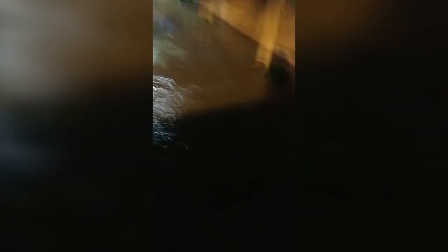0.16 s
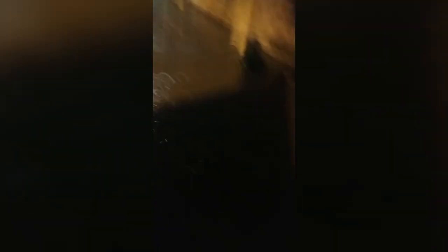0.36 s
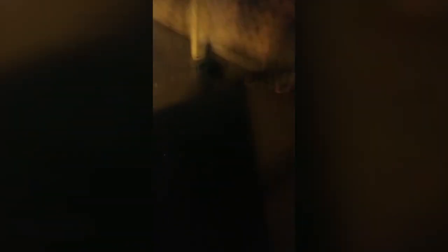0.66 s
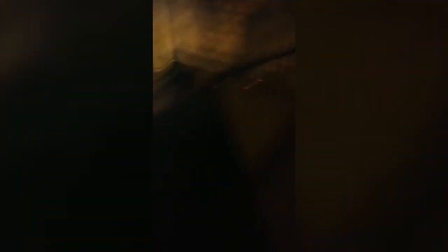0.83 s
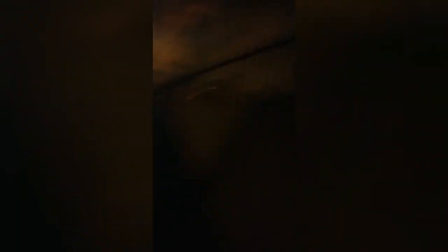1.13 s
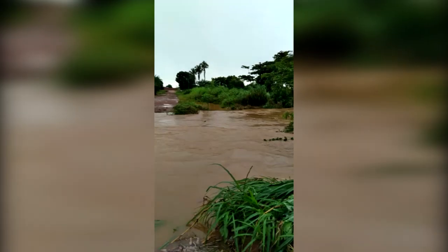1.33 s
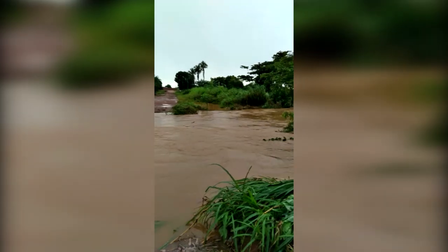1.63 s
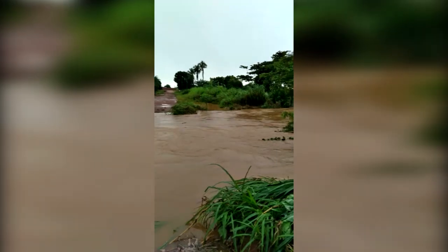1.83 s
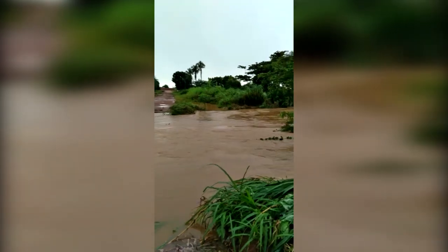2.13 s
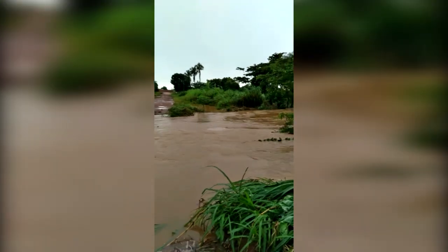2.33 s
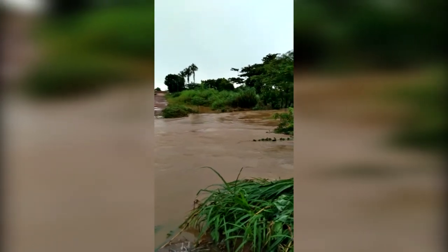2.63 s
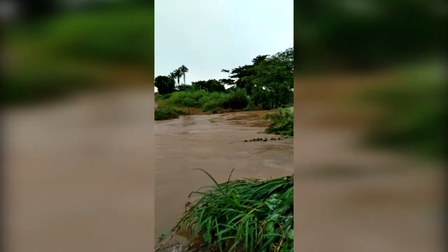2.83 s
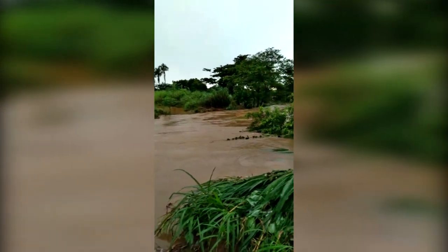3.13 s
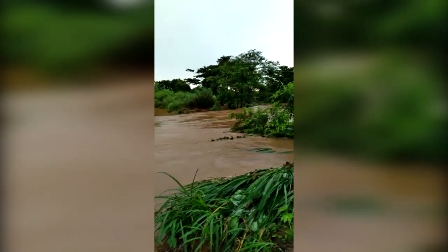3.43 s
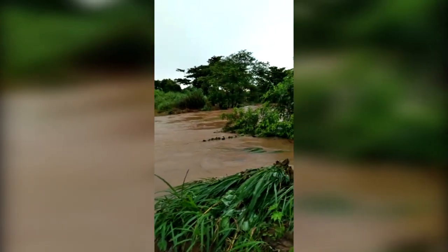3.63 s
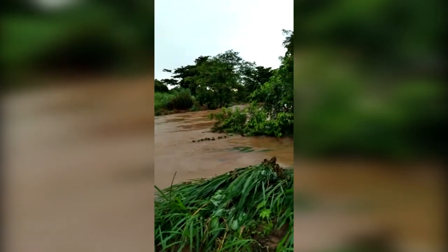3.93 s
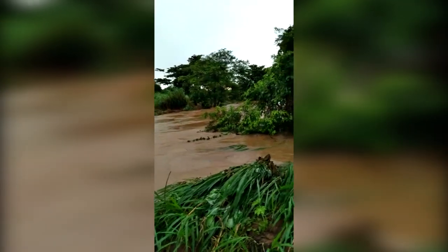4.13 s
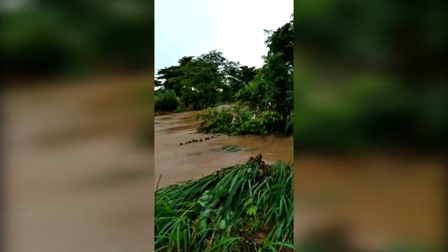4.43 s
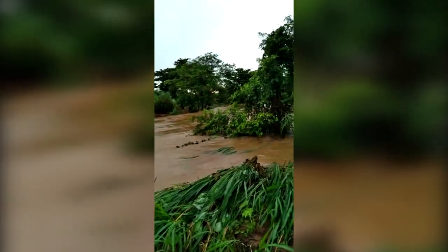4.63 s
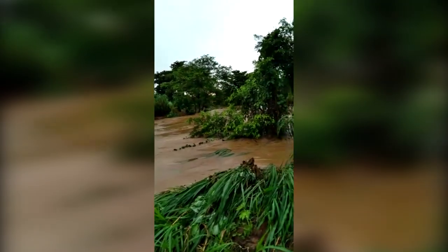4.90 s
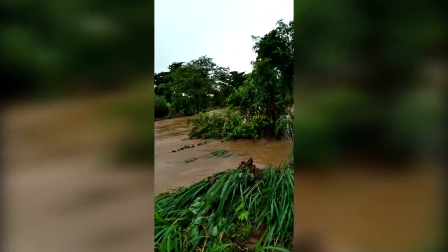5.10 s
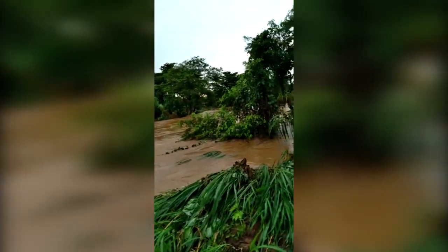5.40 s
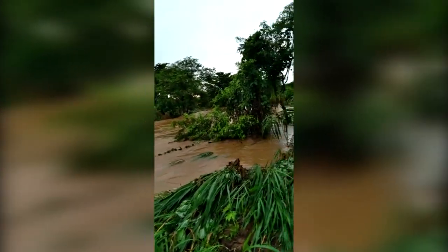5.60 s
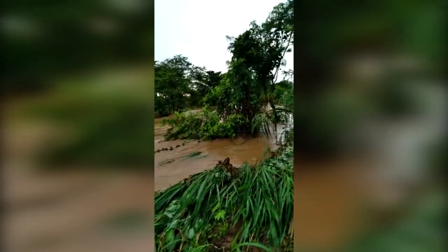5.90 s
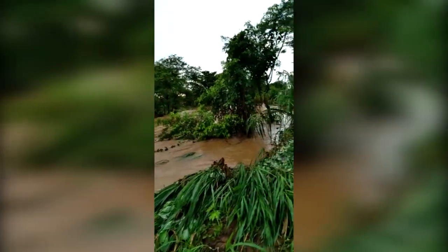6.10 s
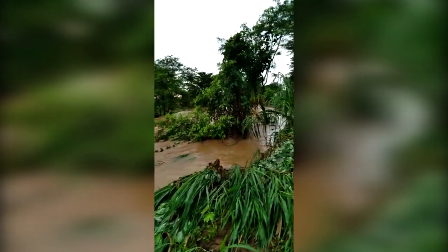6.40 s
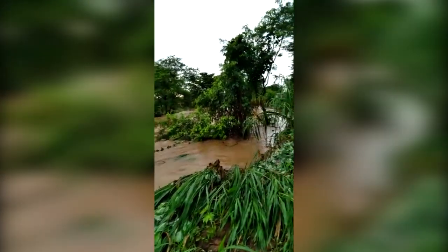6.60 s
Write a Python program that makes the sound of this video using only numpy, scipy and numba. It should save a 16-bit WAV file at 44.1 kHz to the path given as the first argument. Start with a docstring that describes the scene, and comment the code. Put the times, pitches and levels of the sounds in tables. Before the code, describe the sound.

Near-silent night air, a single loud thump on the left, a gap, then muddy floodwater pours steadily with sizzling spray and high bird chirps.

```python
"""A quiet night by a river opens the scene: band-shaped noise murmurs far off, faint blips sound,
a hand rumbles on the phone, and a finger knocks once by squeezing and releasing air in its left port.
After a short silence day fades in on a flooded stream: swarms of damped, gliding bubbles make gurgles,
rush, wash and spray; noise bursts slap, a bird repeats rising sine chirps and another warbles twice.
Meanwhile the phone turns towards the spray at the bank, so the sizzle and the water's colour change."""
import sys
import numpy as np
from scipy import signal
from scipy.fft import rfft, irfft
from scipy.io import wavfile
from scipy.ndimage import uniform_filter1d, map_coordinates
from numba import njit

SR = 44100
rng = np.random.default_rng(int(sys.argv[2]) if len(sys.argv) > 2 else 0)


def master_out(mix):
    """Clip the mix to full scale and print it as 16-bit PCM to the path in sys.argv[1]."""
    frames = np.transpose(np.atleast_2d(mix))
    ceiling = np.clip(frames, -1, 1)
    pcm = np.round(ceiling * 32767).astype(np.int16)
    wavfile.write(sys.argv[1], SR, pcm)


N = 297675
TIME = np.arange(N) / SR  # s
NIGHT_END_S, DAY_START_S = 1.232, 1.53
FADE_S, FADE_START = 0.25, 0.05  # time for a linear rise from 0 to 1; gain at which the day starts

# Surges of the flood, before the balance below
# [t/s, gurgle level/dB, rush level/dB, wash level/dB, spray level/dB]
FLOOD_SURGES = [(1.76, -36.5, -32, -42, -36), (1.87, -33.5, -30.5, -43, -34),
                (2.11, -32.5, -31.5, -41, -33.5), (2.19, -36, -30.5, -40.5, -34),
                (2.97, -35, -33.5, -42.5, -35), (3.1, -37, -32.5, -38, -34.5),
                (3.36, -34, -34.5, -45.5, -36.5), (3.91, -30, -32, -37, -35),
                (4.36, -31, -31.5, -41, -33.5), (4.64, -29, -33, -43.5, -34.5),
                (4.78, -32.5, -30.5, -40.5, -33.5), (6.01, -34, -30, -38.5, -31.5),
                (6.64, -33.5, -32, -39, -34.5)]
GURGLE_DB, RUSH_DB, WASH_DB, SPRAY_DB = -0.47, 1.08, 2.37, 0.72  # balance of the four
# Brightness of the spray as the phone faces water or bank, relative to the spray
# [t/s, sizzle level/dB, mist level/dB]
SPRAY_FACING = [(1.75, -13, -27), (2.25, -9.5, -18), (2.7, -22, -28), (2.95, -19, -23.5), (3.55, -17, -30),
                (3.95, -3.5, -20), (4.5, -7.5, -22), (5.15, -4.5, -17), (5.5, -6.5, -12.5),
                (6.25, -8.5, -12), (6.6, -8.5, -16)]
OPEN_SIZZLE_DB, BANK_SIZZLE_DB = -10.5, -8.5  # sizzle when facing open water, and the bank

# Filter colours of the water, from large bubbles to tiny: each [f/Hz, relative level/dB]
GURGLE_COLOUR = [(25, -27), (40, -15), (60, -1), (85, -3), (125, 1.5), (165, -5), (205, -7), (270, -4),
                 (330, -12), (430, -33), (600, -36)]
RUSH_COLOUR = [(230, -7), (340, 1), (440, -0.5), (570, -4), (780, 0.5), (1000, -0.5), (1200, 0.5),
               (1600, -1.5), (1950, 0), (2300, -5), (2700, -7), (3500, -19.5), (5000, -47)]
WASH_COLOUR = [(2000, -13), (2500, 1.5), (3000, -2), (3600, 1), (4200, -1), (4800, 0), (5400, -9.5),
               (6200, -9), (8000, -37)]
SPRAY_COLOUR = [(4500, -17), (5400, -2.5), (5950, -4.5), (6350, 2.5), (6700, 2.5), (7300, 2.5), (8400, 0.5),
                (9000, -4), (9600, -18), (11000, -33)]
SIZZLE_COLOUR = [(8200, 0), (9000, 0.5), (9700, 1), (10500, 0), (11200, -28), (12500, -23)]
MIST_COLOUR = [(9500, -7), (11000, 1), (11700, -0.5), (12700, -3.5), (14000, -4), (15700, -6.5)]

MIRROR_MS, MIRROR_GAIN = 0.947, 0.18  # reflection off the water: delay and strength 0-1
# Hollows in the water's spectrum; a negative depth is a boost
# [centre f/Hz, half width f/Hz, depth level/dB facing open water, depth level/dB facing the bank]
WATER_HOLLOWS = [(579, 86, 5, 3), (2570, 98, 11.5, -1.2), (3620, 120, 3.5, 0), (4120, 160, 2.5, 6),
                 (5400, 230, 7, 3.5), (5760, 170, 3, 0.5)]
# random wander of the centre (share) and of the depth (dB), changes per s
HOLLOW_DRIFT, HOLLOW_SWING_DB, HOLLOW_RATE = 0.026, 4.5, 10

# Drops slapping close by [t/s, relative level/dB, centre f/Hz]
DROP_SLAPS = [(2.2867, -15.5, 5500), (3.8663, -16, 8400), (4.128, -14.5, 9300), (4.684, -16, 7500),
              (4.7442, -11.5, 9500), (4.8242, -18, 8400), (5.2468, -19, 7500), (5.4108, -10.5, 6800),
              (5.6218, -17, 6750), (5.874, -18, 7700)]
# Big air pockets closing [t/s, relative level/dB, f/Hz]
AIR_GLUGS = [(2.04, -27.5, 254), (3.85, -23.5, 246), (4.293, -24.5, 268), (4.37, -24.5, 455),
             (4.613, -20, 282), (5.27, -24.5, 284), (5.457, -24, 327)]
# Wavelets plopping near the bank [t/s, relative level/dB, f/Hz]
WAVELET_PLOPS = [(2.278, -13, 2000), (2.363, -14, 880), (2.807, -13, 1920), (3.937, -8, 1840),
                 (4.721, -21, 1100), (4.746, -11, 1350), (5.185, -11, 1780), (5.307, -14, 1050),
                 (5.689, -10.5, 1256), (5.795, -21, 1030), (6.587, -16, 1010)]

# Chirps, mostly high and low in turn, with a few deeper answers [t/s, base f/Hz, relative level/dB]
BIRD_CHIRPS = [(1.691, 4710, -28), (1.867, 4500, -30.5), (1.945, 3900, -34), (2.195, 4600, -28),
               (2.561, 4620, -26.5), (2.896, 4480, -29.5), (3.077, 4660, -28), (3.302, 4480, -29.5),
               (3.513, 4660, -28), (3.743, 4440, -30.5), (3.977, 4600, -30.5), (4.196, 4550, -31.5),
               (4.445, 4680, -29.5), (4.625, 4510, -32.5), (4.66, 3800, -35), (4.886, 4630, -29.5),
               (4.915, 3580, -33.5), (5.095, 4520, -30.5), (5.337, 4680, -29), (5.564, 4540, -33),
               (5.762, 4710, -27.5), (5.974, 4570, -35), (6.322, 4660, -28.5), (6.70, 4560, -28.5)]
# Syllables of every chirp [middle t/s after its start, half length t/s, pitch ratio, relative level/dB]
CHIRP_SYLLABLES = [(0.015, 0.02, 1.0, -1.8), (.06, 0.016, 1.015, -2), (.106, 0.026, 1.058, -10.5)]
SYLLABLE_RISE_PER_S, CHIRP_ROUGH = 1.4, 0.37  # glide (share of the pitch per s); rms flutter of the gain
# Slurred notes of the second bird
# [start t/s, length t/s, first f/Hz, middle f/Hz, last f/Hz, level/dB before the echo]
WARBLE_NOTES = [(3.085, .034, 4720, 5100, 5500, -36), (3.098, 0.034, 3050, 3040, 3440, -33),
                (3.104, 0.036, 5260, 5960, 5730, -28), (3.206, 0.018, 5500, 5170, 4450, -36),
                (3.217, 0.016, 3620, 3850, 4800, -37), (3.227, 0.0185, 5100, 5430, 5550, -30.5),
                (3.238, 0.026, 4200, 3940, 4480, -34), (3.254, .024, 5750, 5600, 5070, -30.5)]

# Shifts of the hand on the phone [middle t/s, half length t/s, relative rumble level/dB]
HAND_SHIFTS = [(0.027, 0.044, -47), (0.127, .03, -54), (.275, 0.014, -42.5), (0.473, 0.011, -44),
               (0.527, 0.031, -37.5), (.635, 0.06, -50), (0.848, 0.043, -48), (.983, 0.011, -43),
               (1.17, 0.026, -40)]
HOLD_DB = -57.5  # rumble of the resting hand, before the channel gains
# Colour of the rumble, with a little skin rub on top [f/Hz, relative level/dB per Hz]
HAND_COLOUR = [(20, -27), (45, -2.5), (80, 3), (120, -1.5), (190, -9.5), (300, -27.5), (1000, -39),
               (2000, -45), (3500, -53.5)]
# Faint far blips at night [t/s, f/Hz, level/dB]
NIGHT_BLIPS = [(.035, 669, -44.5), (.14, 1135, -62), (.54, 764, -49.5), (.82, 945, -56), (.835, 1180, -62),
               (1.195, 626, -47.5)]
# Colour of the night air [f/Hz, relative level/dB per Hz]
MURMUR_COLOUR = [(100, -12.5), (200, -18), (300, -15), (430, -14), (540, -7), (620, -1), (740, -9.5),
                 (900, -19), (1200, -23.5), (1600, -31.5), (2400, -37.5), (3500, -41), (7000, -44),
                 (15500, -46.5)]
MURMUR_DB = -55.5  # before the channel gains
TOP_HZ = 15750  # upper band edge of the phone


def stream():
    """Superposition of bubble sizes: each band surges by itself, then hollows are cut in the sum."""
    gurgle_db, rush_db, wash_db, spray_db = curves(FLOOD_SURGES)
    sizzle_db, mist_db = curves(SPRAY_FACING)
    body = gurgle() * undb(gurgle_db + GURGLE_DB + 0.68 * walk(7))
    body += rush() * undb(rush_db + RUSH_DB + 0.59 * walk(8))
    body += wash() * undb(wash_db + WASH_DB)
    hiss = spray() + sizzle() * undb(sizzle_db) + mist() * undb(mist_db + 3.4 * walk(12))
    hiss *= undb(spray_db + SPRAY_DB)
    # 0 is open water, 1 is the bank
    towards_bank = np.clip((sizzle_db - OPEN_SIZZLE_DB) / (BANK_SIZZLE_DB - OPEN_SIZZLE_DB), 0, 1)
    return hollowed(body + hiss, towards_bank)


def gurgle():
    """Low resonance of large bubbles."""
    swarm = bubbles(56.35, 456, cycles=17.4, spread_db=1.0, far_db=-1.5, count=1800)
    return colour(swarm, GURGLE_COLOUR)


def rush():
    """Resonance of medium bubbles, with interference from the water surface."""
    swarm = bubbles(287.3, 3023, cycles=24.6, spread_db=2.5, far_db=1.5, count=9000)
    return mirrored(wavering(colour(swarm, RUSH_COLOUR), depth_db=1.96, band_hz=181.5, hold_s=.12))


def wash():
    """Resonance of small bubbles, with interference from the water surface."""
    swarm = bubbles(2032, 6950, cycles=43, spread_db=3.0, far_db=-1, count=7000)
    return mirrored(wavering(colour(swarm, WASH_COLOUR), depth_db=3.6, band_hz=240, hold_s=.13))


def spray():
    """High resonance of fine bubbles, amplitude-modulated by a rapid random flicker."""
    swarm = bubbles(4360, 16500, cycles=12, spread_db=3.5, far_db=2.0, count=18000)
    fizz = swarm * undb(0.71 * walk(35))
    return wavering(colour(fizz, SPRAY_COLOUR), depth_db=1.35, band_hz=252, hold_s=.1)


def sizzle():
    """Short-lived resonance of tiny bubbles in a narrow high band."""
    swarm = bubbles(8600, 10700, cycles=12, spread_db=4, far_db=-2.5, count=7000)
    return wavering(colour(swarm, SIZZLE_COLOUR), depth_db=5.0, band_hz=260, hold_s=0.062)


def mist():
    """The highest bubble resonances, largely merged into noise."""
    swarm = bubbles(9340, 15300, cycles=60, spread_db=4, far_db=6, count=5000)
    return wavering(colour(swarm, MIST_COLOUR), depth_db=7.5, band_hz=170, hold_s=0.09)


def bubbles(low_hz, high_hz, cycles, spread_db, far_db, count):
    """Superposed resonators of mixed size, a few of them close, over the blur of countless far ones."""
    when, pitch, life, near = rng.random((count, 4)).T
    hz = low_hz * (high_hz / low_hz) ** pitch
    size = undb(-spread_db * np.log(1 - .99 * near)) * hz / low_hz
    swarm = ring(when * N / SR, hz, max(cycles, 1) * (.5 + life), size, 0.23)
    # at far_db = 0 the blur has the same power per Hz as the swarm
    blur = np.sqrt(SR / 2 / (high_hz - low_hz)) * noise()
    return unit(swarm) + undb(far_db) * blur


@njit
def ring(starts, hz, cycles, size, rise):
    """Damped resonance gliding upward, as in bubbles nearing the surface; cycles counts to -50 dB."""
    out = np.zeros(N)
    for k in range(len(starts)):
        first, length = int(starts[k] * SR), int(cycles[k] * SR / hz[k]) + 2
        # z is a rotating phasor, p its turn and decay per sample
        z, p = size[k] + 0j, np.exp(2j * np.pi * hz[k] / SR - 5.75 / length)
        glide = np.exp(2j * np.pi * hz[k] / SR * rise / length)
        for i in range(max(first, 0), min(first + length, N)):
            out[i] += z.imag
            z *= p
            p *= glide
    return out


def mirrored(x):
    """Interference: the water surface sends a copy a moment late, which carves soft notches."""
    late = np.interp(TIME - MIRROR_MS / 1000, TIME, x)
    return unit(x + MIRROR_GAIN * late)


def wavering(x, depth_db, band_hz, hold_s):
    """Random modulation in time and frequency: neighbouring bands swell and sink by chance; rms 1."""
    grid = dict(nperseg=1024, noverlap=768)
    f, t, cells = signal.stft(x, SR, **grid)
    field = rng.standard_normal((400, 400))
    points = np.meshgrid(f / band_hz, t / hold_s, indexing="ij")
    swell = map_coordinates(field, points, order=1, mode="mirror")
    return unit(signal.istft(cells * undb(depth_db * swell), SR, **grid)[1][:N])


def hollowed(x, towards_bank):
    """Heterodyne filtering: wandering bands are shifted to 0 Hz, isolated, shifted back and subtracted."""
    for hz, width_hz, open_db, bank_db in WATER_HOLLOWS:
        depth_db = open_db + (bank_db - open_db) * towards_bank + HOLLOW_SWING_DB * walk(HOLLOW_RATE)
        centre_hz = hz * (1 + HOLLOW_DRIFT * walk(HOLLOW_RATE))
        carrier = np.exp(2j * np.pi * np.cumsum(centre_hz) / SR)
        low_pass = signal.butter(2, width_hz, fs=SR, output="sos")
        band = signal.sosfiltfilt(low_pass, x / carrier) * carrier
        # a boost stops at 1 dB
        x = x - (1 - undb(-np.maximum(depth_db, -1))) * 2 * band.real
    return x


def splashes():
    """Impact and cavity resonance: near drops slap, air pockets glug and wavelets plop."""
    return drops() + pockets(AIR_GLUGS, cycles=24.6, gain_db=1.0) + pockets(WAVELET_PLOPS, cycles=37, gain_db=-9.0)


def drops(slap_s=0.0018, trail_s=0.032, trail_db=-19, drop_db=-5):
    """Impact noise: a band-limited burst decays first as a slap, then as a weaker trail of fizz."""
    out, t = np.zeros(N), TIME[:SR // 20]
    decay = np.exp(-t / slap_s) + undb(trail_db) * np.exp(-t / trail_s)
    for s, db, hz in DROP_SLAPS:
        band = signal.butter(4, [hz * .62, min(hz * 1.3, 11200)], "band", fs=SR, output="sos")
        burst = unit(signal.sosfilt(band, rng.standard_normal(len(t))))
        add(out, s, undb(db + drop_db) * burst * decay)
    return out


def pockets(rows, cycles, gain_db):
    """Damped resonance of single large bubbles close by."""
    s, db, hz = np.array(rows, float).T.copy()
    return ring(s, hz, np.full(len(s), float(cycles)), undb(db + gain_db), 0.087)


def birds(trees_t60=0.47, trees_db=-5):
    """Reverberation by scattering: foliage returns a short decaying echo (T60 in s) of both birds."""
    out = chirps() + warbles()
    t = TIME[:SR // 2]
    echo = rng.standard_normal(len(t)) * np.exp(-np.log(1000) * t / trees_t60)
    return out + undb(trees_db) * signal.fftconvolve(out, echo / np.linalg.norm(echo))[:N]


def chirps(lead_s=.02):
    """Frequency and amplitude modulation: rising, fluttering syllables; lead_s leaves room for the onset."""
    out, t = np.zeros(N), TIME[:SR // 5] - lead_s
    for s, hz, db in BIRD_CHIRPS:
        flutter = 1 + CHIRP_ROUGH * unit(uniform_filter1d(rng.standard_normal(len(t)), SR // 150))
        for middle, half, ratio, syllable_db in CHIRP_SYLLABLES:
            pitch = hz * ratio * (1 + SYLLABLE_RISE_PER_S * (t - middle))
            gain = undb(db + syllable_db) * flutter * bell(t, middle, half)
            add(out, s - lead_s, whistle(pitch, gain, waver=.021))
    return out


def warbles():
    """Frequency modulation: each slurred note follows a parabola through three pitches."""
    out = np.zeros(N)
    for s, length, first_hz, middle_hz, last_hz, db in WARBLE_NOTES:
        u = np.linspace(0, 1, int(length * SR))
        parabola = np.polyfit([0, .5, 1], [first_hz, middle_hz, last_hz], 2)
        gain = undb(db) * np.sqrt(np.abs(np.sin(np.pi * u)))
        add(out, s, whistle(np.polyval(parabola, u), gain, waver=.016))
    return out


def whistle(hz, gain, waver):
    """Frequency modulation: a near-sine tone whose pitch trembles; waver is the rms share."""
    tremble = unit(uniform_filter1d(rng.standard_normal(len(hz)), SR // 400))
    return gain * np.sin(2 * np.pi * np.cumsum(hz * (1 + waver * tremble)) / SR)


def knock(at_s=.2406, press_s=0.0032, release_s=0.0002, port_hz=72, port_q=1.4, knock_db=7):
    """High-pass response to a pressure step: a finger squeezes air into the left port and lets go."""
    squeeze = np.exp(np.minimum(TIME - at_s, 0) / press_s)
    release = .5 * (1 - np.tanh((TIME - at_s) / (2 * release_s)))
    w = 2 * np.pi * port_hz
    port = signal.bilinear([1, 0, 0], [1, w / port_q, w * w], SR)  # bass roll-off, slightly resonant
    return undb(knock_db) * signal.lfilter(*port, squeeze * release)


def grip():
    """Envelope of contact noise: a steady hold plus a swell for each shift of the hand."""
    return undb(HOLD_DB) + sum(undb(db) * bell(TIME, s, half) for s, half, db in HAND_SHIFTS)


def blips(blip_s=0.014):
    """Amplitude modulation: faint trembling tones under bell-shaped envelopes."""
    return sum(whistle(np.full(N, hz), undb(db) * bell(TIME, s, blip_s), waver=0.026)
               for s, hz, db in NIGHT_BLIPS)


def night(murmur_left_db=-3, murmur_right_db=5, grip_left_db=4, grip_right_db=-8):
    """Diffuse field: independent murmur in each channel; the hand shades the left port and rumbles on it."""
    swell = undb(MURMUR_DB + 1.1 * walk(8.7))
    hand = grip()

    def side(murmur_db, grip_db):
        """Incoherent sum of murmur and hand rumble."""
        murmur = undb(murmur_db) * swell * colour(noise(), MURMUR_COLOUR)
        return murmur + undb(grip_db) * hand * colour(noise(), HAND_COLOUR)

    left = side(murmur_left_db, grip_left_db) + knock()
    right = side(murmur_right_db, grip_right_db)
    return np.array([left, right]) + blips()


def undb(db):
    """Logarithmic level: decibels to amplitude gain."""
    return 10 ** (np.asarray(db) / 20)


def unit(x):
    """Normalisation: scale to rms 1."""
    return x / np.sqrt(np.mean(x ** 2) + 1e-18)


def curves(rows, t=TIME):
    """Linear interpolation: each column of a table joined by straight lines in time."""
    s, *columns = np.transpose(rows)
    return [np.interp(t, s, c) for c in columns]


def colour(x, points):
    """Spectral filtering by [f/Hz, level/dB], falling 40 dB per octave outside the ends; rms 1."""
    hz, db = np.transpose(points)
    octave = np.log2(np.maximum(np.fft.rfftfreq(N, 1 / SR), 1))
    outside = np.abs(octave - np.clip(octave, np.log2(hz[0]), np.log2(hz[-1])))
    gain = undb(np.interp(octave, np.log2(hz), db) - 40 * outside)
    return unit(irfft(rfft(x) * gain, N))


def noise():
    """White noise: equal power per Hz."""
    return rng.standard_normal(N)


def walk(rate):
    """Slow random modulation: levels held 1 / rate s and smoothed twice; spread near 1."""
    k = max(int(SR / rate), 1)
    held = np.repeat(noise()[:N // k + 1], k)
    return 1.3 * uniform_filter1d(uniform_filter1d(held, k), k)[:N]


def bell(t, middle_s, half_s):
    """Gaussian envelope: a smooth swell and fall around a moment."""
    return np.exp(-((t - middle_s) / half_s) ** 2)


def add(out, s, sound):
    """Linear superposition: mix a short sound in at time s."""
    i = max(int(s * SR), 0)
    out[i:i + len(sound)] += sound[:max(N - i, 0)]


def scene():
    """Succession and superposition: night in stereo, a silence, then the day fades in, in mono."""
    fade = np.clip(FADE_START + (TIME - DAY_START_S) / FADE_S, 0, 1) * (TIME > DAY_START_S)
    day = stream() + splashes() + birds()
    return night() * (TIME < NIGHT_END_S) + fade * day


def record(dry):
    """Saturation and band limiting: the phone clips at full scale and cuts the top."""
    low_pass = signal.ellip(10, .1, 80, TOP_HZ, fs=SR, output="sos")
    return signal.sosfilt(low_pass, np.clip(dry, -1, 1))


dry = scene()
out = record(dry)
master_out(out)
```